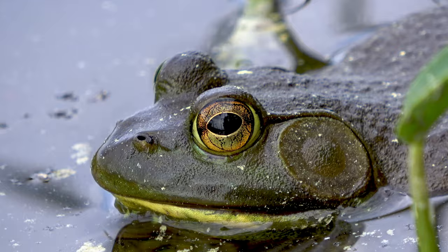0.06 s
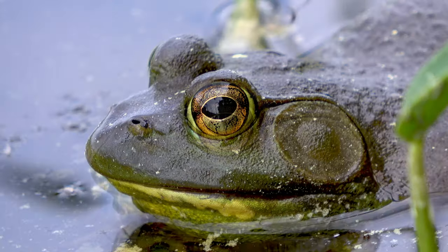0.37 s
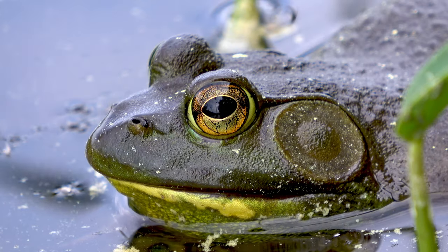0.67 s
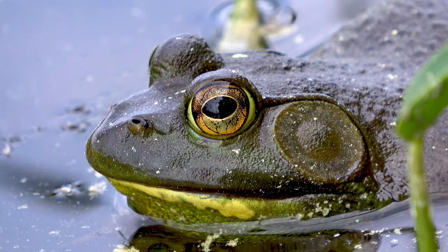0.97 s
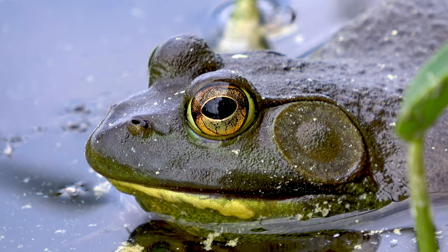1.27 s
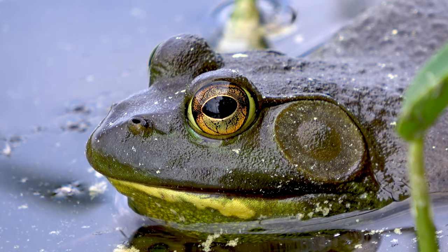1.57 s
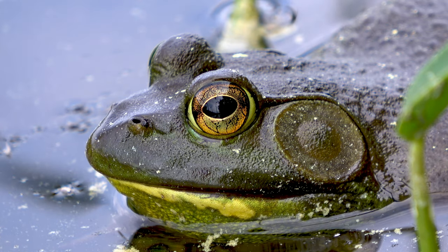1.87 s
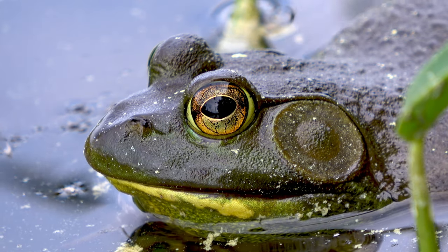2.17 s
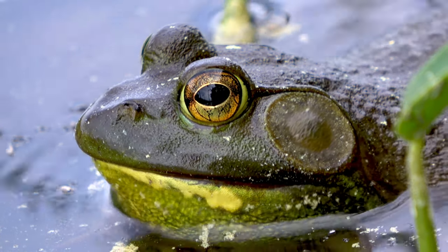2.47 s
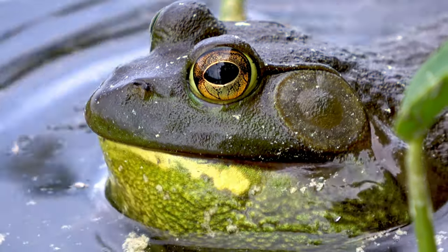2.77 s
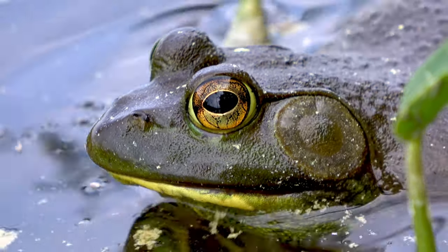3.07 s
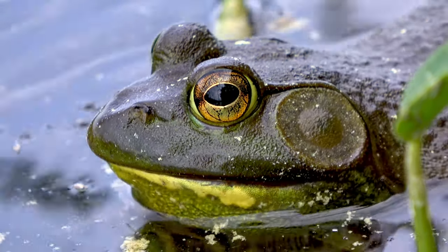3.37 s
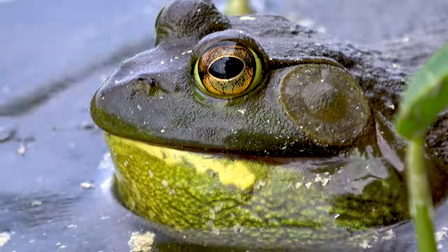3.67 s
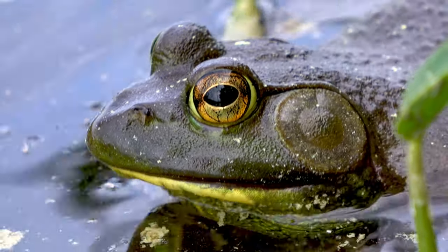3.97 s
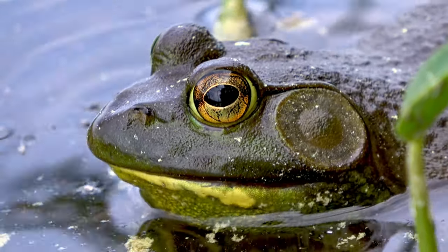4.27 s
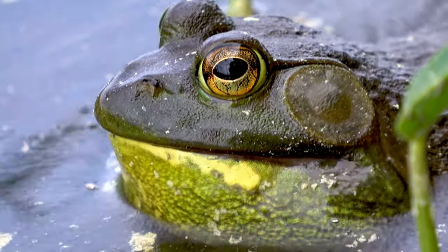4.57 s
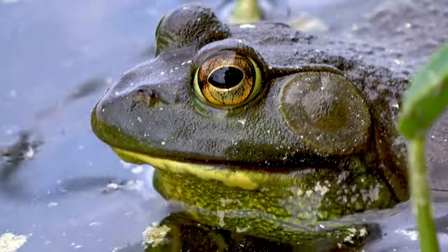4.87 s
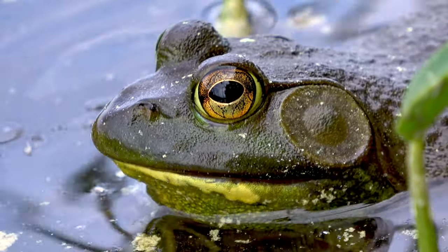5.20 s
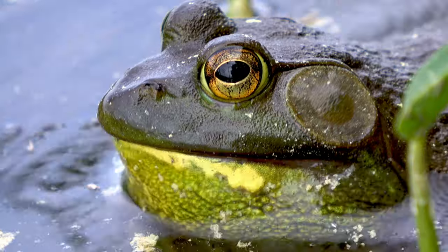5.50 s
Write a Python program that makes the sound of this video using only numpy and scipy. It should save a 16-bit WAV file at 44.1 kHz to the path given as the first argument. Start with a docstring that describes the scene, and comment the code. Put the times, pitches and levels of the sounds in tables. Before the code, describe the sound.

A close bullfrog gives four deep, droning bellows while small birds chirp and trill faintly in the background.

```python
"""Bullfrog at a still pond

A close bullfrog bellows four times: vocal fold pulses ring its sac and throat. Each bellow starts as
a ragged rattle, locks into a steady drone as the sac fills, then mellows and sags in pitch.
Small birds (gliding sines) chip, whistle and trill in the trees to the right, over faint outdoor air."""
import sys
import numpy as np
from scipy import signal
from scipy.fft import rfft, irfft, next_fast_len
from scipy.io import wavfile
from scipy.ndimage import uniform_filter1d, minimum_filter1d, map_coordinates

SR = 44100
rng = np.random.default_rng(int(sys.argv[2]) if len(sys.argv) > 2 else 0)


def master(y):
    """Save y as 16-bit WAV."""
    cut = np.clip(np.atleast_2d(y).T, -1, 1)
    pcm = np.round(cut * 32767)  # scale
    wavfile.write(sys.argv[1], SR, pcm.astype(np.int16))


N = 244314

# reverberation of the near bank and of the trees behind: f/Hz, T60/s
BANK_DECAY = [(200, 0.082), (1000, 0.38), (8000, .1)]
TREE_DECAY = [(200, 0.84), (1000, 0.7), (3500, 1.1), (7000, .5), (14000, 0.1)]
# resonances of sac, eardrums and throat, sac taut: f/Hz, width/Hz, relative level/dB
TAUT_MODES = [(268, 37, -2.5), (391, 120, 5), (854, 110, -4.5), (1402, 180, -8), (1538, 132, -5.5),
              (2090, 180, -11), (2610, 32, -34.5), (3250, 110, -34), (4060, 570, -48), (7000, 33, -45.5),
              (8700, 1000, -41)]
# hard snaps of the folds: t/s, relative level/dB
FOLD_SNAPS = [(2.4924, -16.5), (2.5167, -12), (3.4416, -20), (3.4652, -14.5), (3.4855, -14.5),
              (3.4965, -6.5), (4.4289, -2.5), (4.4426, -7.5), (4.4509, -2), (5.3329, -11.5), (5.3471, -6.5),
              (5.451, -16.5), (5.492, -2.5), (5.4916, -4.5), (5.4975, -4.5)]


def amp(db):
    """Decibels to gain."""
    return 10 ** (np.asarray(db) / 20)


def unit(x):
    """x at rms 1."""
    return x / np.sqrt(np.mean(x ** 2) + 1e-20)


def even(x):
    """x with its slow level held at rms 1; single pulses keep their relative sizes."""
    power = uniform_filter1d(uniform_filter1d(x ** 2, size=1100), size=700)
    return x / np.sqrt(np.abs(power) + np.mean(x ** 2) * 1e-4)


def along(points, hz):
    """(f/Hz, value) points read on a log axis."""
    f, v = np.transpose(points)
    return np.interp(np.log(hz + 1), np.log(f + 1), v)


def wobble(rate_hz):
    """Smooth random curve with knots at rate_hz."""
    knots = rng.standard_normal(int(N * rate_hz / SR) + 4)
    return map_coordinates(knots, [np.arange(N) * rate_hz / SR])


def filtered(x, response):
    """x through a zero-phase response(hz)."""
    m = next_fast_len(N + SR // 2)
    return irfft(rfft(x, m) * response(np.fft.rfftfreq(m, 1 / SR)), m)[..., :N]


def cut(x, kind, hz, order):
    """Causal high-pass or low-pass."""
    return signal.sosfilt(signal.butter(order, hz, kind, fs=SR, output="sos"), x)


def crossover(x, kind, hz):
    """One side of a zero-phase crossover."""
    return signal.sosfiltfilt(signal.butter(3, hz, kind, fs=SR, output="sos"), x)


def echo(x, decay):
    """Diffuse stereo tail; each frequency dies at its own rate."""
    hz, t, noise = signal.stft(rng.standard_normal((2, SR)), SR, nperseg=256)
    tail = signal.istft(noise * amp(-60 * t / along(decay, hz)[:, None]), SR, nperseg=256)[1]
    delayed = np.pad(x, (300, 0))[None]
    return signal.fftconvolve(delayed, tail / np.linalg.norm(tail[0]), axes=1)[:, :N]


def air(level_db=-62):
    """Faint outdoor rush: shaped noise, partly alike in both ears."""
    # f/Hz, relative density/dB
    spectrum = [(20, -23), (50, -7.5), (100, -2.5), (200, -3.5), (420, -7), (670, 0), (830, -5.5),
                (1020, -1.5), (1600, -14.5), (2600, -12.5), (4500, -17.5), (8000, -17), (15000, -21.5)]
    # f/Hz, left-right correlation
    coherence = [(60, 0.35), (160, 0.4), (400, 0.87), (1040, 0.46), (2680, 0.23)]

    def mid_side(hz):
        angle = np.arccos(np.clip(along(coherence, hz), -1, 1)) / 2
        return amp(along(spectrum, hz)) * [np.cos(angle), np.sin(angle)]

    mid, side = filtered(rng.standard_normal((2, N)), mid_side)
    return unit(np.array([mid + side, mid - side])) * amp(level_db + 0.41 * wobble(1.3))


def bird_note(path, waver, onset_s, db, fade_s=.0045):
    """Sine along a (t/s, f/Hz, level/dB) path; waver is the fractional pitch deviation."""
    path_s, path_hz, path_db = np.transpose(path)
    first = max(0, int((onset_s + path_s[0] - .005) * SR))
    last = min(N, int((onset_s + path_s[-1] + .005) * SR))
    t = np.arange(first, last) / SR - onset_s
    hz = np.interp(t, path_s, path_hz) * (1 + waver[first:last])
    gate = np.clip(np.minimum(t - path_s[0], path_s[-1] - t) / fade_s + 1, 0, 1)
    envelope = np.sqrt(2) * amp(db + np.interp(t, path_s, path_db)) * gate
    track = np.zeros(N)
    track[first:last] = envelope * np.sin(2 * np.pi * np.cumsum(hz) / SR)
    return track


def chips(gap_s=.1073):
    """Evenly spaced falling chips; one run fades, the other grows."""
    # one chip: t/s, f/Hz, relative level/dB
    path = [(0, 6800, 2), (.012, 6600, -22.5), (.034, 5960, 1), (.047, 4350, -2), (.058, 3250, -19.5)]
    # start/s, length/s, first and last relative level/dB
    runs = [(-.049, .48, -42.5, -64.5), (3.867, 1.65, -58.5, -46.5)]
    track = np.zeros(N)
    for start_s, length_s, first_db, last_db in runs:
        for age_s in np.arange(0, length_s, gap_s):
            db = first_db + (last_db - first_db) * age_s / length_s
            track += bird_note(path, 0.067 * wobble(1200), start_s + age_s, db)
    return track


def slur(row, waver, arch_db=7.5):
    """Bird note bent smoothly through three pitches, loudest in the middle."""
    start_s, length_s, first_hz, middle_hz, last_hz, db = row
    u = np.linspace(-1, 1, 25)
    hz = middle_hz + (last_hz - first_hz) / 2 * u + ((first_hz + last_hz) / 2 - middle_hz) * u ** 2
    path = np.column_stack([length_s * (u + 1) / 2, hz, -arch_db * u ** 2])
    return bird_note(path, waver, start_s, db)


def far_birds():
    """Soft hoarse calls, heard only as reverberation."""
    # start/s, length/s, first, middle and last f/Hz, relative level/dB
    calls = [(.58, .56, 2400, 2800, 2650, -68), (2.0, .42, 3700, 3300, 3000, -66),
             (3.0, .42, 3100, 3000, 2800, -72)]
    return echo(sum(slur(row, .15 * wobble(900)) for row in calls), BANK_DECAY)


def whistles():
    """Slurred notes, husky with fast pitch jitter."""
    # start/s, length/s, first, middle and last f/Hz, relative level/dB
    notes = [(1.456, 0.062, 3780, 3835, 3100, -48.5), (1.529, 0.22, 3420, 4394, 4620, -45),
             (1.71, 0.024, 4480, 4000, 3400, -48.5), (1.64, 0.036, 3500, 2640, 3600, -66),
             (2.423, 0.033, 3450, 4030, 4760, -49.5), (2.485, 0.082, 5500, 5000, 4600, -54),
             (2.625, 0.032, 3600, 4150, 4180, -45.5), (2.904, 0.034, 3010, 3450, 4100, -54.5),
             (2.938, .04, 3880, 2800, 2330, -64), (2.993, 0.089, 2920, 3096, 3035, -64.5),
             (4.034, 0.039, 3396, 4170, 4175, -54), (4.08, 0.066, 4400, 2750, 2770, -45.5),
             (4.176, 0.07, 2900, 2700, 3550, -45.5), (4.258, .05, 3450, 2860, 2400, -46),
             (4.269, .09, 3480, 3460, 3300, -54), (5.135, 0.26, 3250, 4280, 5170, -50),
             (5.371, 0.032, 4750, 4180, 4000, -48.5)]
    husk = .03 * wobble(900)
    return sum(slur(row, husk) for row in notes)


def buzz(rate_hz=76, depth=.105):
    """One bird note that buzzes with fast pitch swings."""
    # start/s, length/s, first, middle and last f/Hz, relative level/dB
    note = (1.772, .223, 4400, 4450, 4230, -47.5)
    swing_hz = rate_hz * (1 + 0.053 * wobble(27))
    swing = depth * np.sin(2 * np.pi * np.cumsum(swing_hz) / SR)
    return slur(note, swing + .06 * wobble(1500))


def strike(track, at_s, modes, samples, attack_s):
    """Add one ring of the (f/Hz, width/Hz, level/dB) modes; a slow attack is a soft push."""
    first = int(np.ceil(at_s * SR))
    t = np.arange(first, min(first + samples, len(track))) / SR - at_s
    hz, width_hz, db = modes.T[:, :, None]
    partials = amp(db) * np.exp(-np.pi * width_hz * t) * np.sin(2 * np.pi * hz * t)
    track[first:first + len(t)] += partials.sum(0) * np.tanh(t / attack_s) ** 2


def gesture(row):
    """Control curves of one bellow: it swells, settles, drones and lets go."""
    start, swell_s, settle_s, drone_s, release_s, hz, first_db, peak_db, mellow_db = row
    onset_s, stop_s, fill_s, drain_s = .02, .016, .13, .033
    slack_pitch, rise_s, creep_per_s, end_sag = .87, .21, .039, .18
    ebb_db_per_s, release_db = 21.5, 15
    throat_db, late_db, open_s, close_db = -3, 15.5, .115, 9
    full, taut, spent, stop = start + np.cumsum([swell_s, settle_s, drone_s, release_s])
    t = np.arange(int((start - onset_s) * SR), min(N, int((stop + stop_s) * SR))) / SR
    held_s = np.clip(t - taut, 0, drone_s)
    letting_go = np.maximum(0, t - spent) / release_s
    rise = np.interp(t, [start, start + rise_s], [slack_pitch, 1])
    pitch_hz = hz * (rise + creep_per_s * held_s - end_sag * letting_go ** 2)
    swell_db = np.interp(t, [start, full], [first_db, peak_db])
    voice_db = swell_db - ebb_db_per_s * held_s - release_db * letting_go
    # each snap spends pressure, so the voice dips just after it
    drained = sum(amp(db - np.interp(s, t, voice_db)) * np.exp(-2 * ((t - s) / drain_s - 1) ** 2)
                  for s, db in FOLD_SNAPS if start < s < stop)
    dip_db = 0.57 * np.sqrt(drained)
    # throat ring re sac boom: opens late, mellows in the drone, closes first
    opening_db = throat_db - late_db * np.exp((start - t) / open_s)
    mellow = np.interp(t, [full - settle_s, taut, taut + drone_s / 3, spent], [0, 1, 1, 0])
    ring_db = opening_db - mellow_db * mellow - close_db * letting_go
    ragged = np.interp(t, [start, taut - .045, taut], [.88, .61, .068])
    gate = np.interp(t, [start - onset_s, start + onset_s, stop - stop_s, stop + stop_s], [0, 1, 1, 0])
    stages_s = taut - fill_s, taut, taut + drone_s / 2, spent + .018
    return t, pitch_hz, voice_db - dip_db, ring_db - dip_db, ragged, gate, stages_s


def bellow(row, cross_hz=600, wheeze_db=-43, hum_db=-39):
    """Fold pulses ring the sac and throat, whose resonances glide as the sac fills and empties."""
    # resonances at the other stages: f/Hz, width/Hz, relative level/dB
    swelling_modes = [(260.2, 37.4, 2.5), (364, 91, 4.5), (747, 48, -16), (1300, 128, -10),
                      (1710, 220, -18), (2170, 180, -44), (2700, 200, -47), (3400, 610, -45),
                      (4270, 500, -45.5), (6800, 530, -48.5), (8800, 1700, -56)]
    easing_modes = [(310, 19, 1.5), (398, 68, 0.5), (840, 120, -8.5), (1251, 31, -11), (1703, 62, -16),
                    (2026, 130, -13.5), (2470, 31, -29), (3170, 100, -28.5), (4040, 350, -34.5),
                    (6430, 45, -47.5), (8600, 1100, -39.5)]
    spent_modes = [(309.7, 25, 10), (426.5, 42, 8.5), (824, 240, -9.5), (1185, 56, -15), (1700, 104, -24.5),
                   (2070, 54, -32.5), (2660, 210, -29), (3630, 290, -47.5), (4080, 260, -47),
                   (6400, 60, -44.5), (8600, 1300, -37)]
    throat_jitter_s, sac_jitter_s, scatter_db, throb_db = .0008, .00057, 5, 2  # at roughness 1
    flicker_db, pitch_follow, rebound, rasp = 3, .33, .4, .17
    t, pitch_hz, voice_db, ring_db, ragged, gate, stages_s = gesture(row)
    effort = amp(voice_db - voice_db.max())
    cycles = np.cumsum(pitch_hz) / SR
    pulses_s = np.interp(np.arange(cycles[-1] - 1), cycles, t)
    shapes = np.array([swelling_modes, TAUT_MODES, easing_modes, spent_modes])
    steps = np.arange(len(shapes))
    boom, ring, wheeze = np.zeros((3, len(t)))
    for s in pulses_s:
        late, strong, throb, again, stray = rng.standard_normal(5)
        rough = np.interp(s, t, ragged)
        blend = np.maximum(0, 1 - abs(np.interp(s, stages_s, steps) - steps))
        modes = np.tensordot(blend, shapes, 1)
        modes[2:, 0] *= min(1, np.interp(s, t, pitch_hz) / np.median(pitch_hz)) ** pitch_follow
        # slack folds open unevenly; the treble flickers even in the drone
        modes[:, 2] += scatter_db * rough * strong + throb_db * rough ** 4 * throb
        treble = np.clip(modes[:, 0] / 3000, 0, 1) ** 3
        modes[:, 2] += flicker_db * treble * rng.standard_normal(len(modes))
        sac, throat, top = modes[:2], modes[2:-2], modes[-2:]
        # the folds open more sharply with effort and soften as the air runs out
        emptied = np.interp(s, stages_s[2:], [0, 1])
        attack_s = .00017 * (np.interp(s, t, effort) + 0.0037) ** -.8 * (1 + 0.77 * emptied)
        sac_s = max(0, s - t[0] + sac_jitter_s * rough * late)
        throat_s = max(0, s - t[0] + throat_jitter_s * rough * late)
        strike(boom, sac_s, sac, 3000, attack_s + 0.0017)
        strike(ring, throat_s, throat, 900, attack_s)
        # slack folds bounce a second time within the cycle
        bounce_s = throat_s + 0.0027 + 0.00034 * abs(stray)
        bounce_db = 20 * np.log10(abs(rebound * rough * again) + 1e-6)
        strike(ring, bounce_s, throat + [0, 0, bounce_db], 900, attack_s)
        strike(wheeze, throat_s + 0.00067 * abs(stray), top + [70 * late, 0, 1.9 * again], 900, .0004)
    # air rasps through the folds while they close badly
    rush = cut(rng.standard_normal(len(t)), "highpass", 3400, order=3)
    rush = unit(cut(rush, "lowpass", 3400, order=3))
    ring = even(ring)
    ring += rasp * ragged * effort * rush * uniform_filter1d(np.abs(ring), size=40)
    ring = even(crossover(cut(ring, "lowpass", 4600, order=6), "highpass", cross_hz))
    boom = even(cut(crossover(boom, "lowpass", cross_hz), "highpass", 262, order=7))
    # on top: a thin wheeze, its octave and some fizz
    wheeze = even(wheeze)
    fizz = rng.standard_normal(len(t)) * np.abs(ring)
    fizz = cut(cut(fizz, "lowpass", 9400, order=6), "highpass", 7200, order=3)
    wheeze = cut(wheeze + .06 * wheeze ** 2 + 1.7 * fizz, "highpass", 4500, order=4)
    hum = amp(hum_db) * effort * np.sqrt(2) * np.sin(2 * np.pi * cycles)
    voice = amp(voice_db) * (boom + amp(ring_db) * ring + amp(wheeze_db) * wheeze + hum) * gate
    return np.pad(voice, (int(t[0] * SR), N))[:N]


def squeal(row, start_hz=6840, fall=.17, length_s=.26, level_db=-61.5, octave_db=-7.5):
    """Air squeezed into the filling sac whistles thinly, falling and pulsing with the folds."""
    t, pitch_hz, *_, (_, taut_s, mid_drone_s, _) = gesture(row)
    progress = np.clip(1 + (t - (taut_s + mid_drone_s) / 2) / length_s, 0, 1)
    hz = start_hz * (1 - fall * progress ** 3) * (1 + 0.0049 * wobble(500)[:len(t)])
    phase = 2 * np.pi * np.cumsum(hz) / SR
    pulsing = 1 + .6 * np.sin(2 * np.pi * np.cumsum(pitch_hz) / SR)
    envelope = amp(level_db) * np.sin(np.pi * progress ** 2) * pulsing
    tone = envelope * (np.sin(phase) + amp(octave_db) * np.sin(2 * phase))
    return np.pad(tone, (int(t[0] * SR), N))[:N]


def snaps():
    """The folds catch and let go with a bright crack."""
    upper_throat = np.array(TAUT_MODES)[3:-2]
    cracks = np.zeros(N)
    for s, db in FOLD_SNAPS:
        strike(cracks, s, upper_throat + [0, 0, db + 3], samples=900, attack_s=.0002)
    crackle = rng.standard_normal(N) * uniform_filter1d(np.abs(cracks), size=80)
    return cut(cut(cracks + .14 * crackle, "highpass", 900, order=2), "lowpass", 4600, order=3)


def frog():
    """Four bellows; a faint low flutter of the heaving sac grows quickly with effort."""
    # start/s, swell/s, settle/s, drone/s, release/s, f/Hz, first and peak level/dB, mellowing/dB
    bellows = [(2.224, .31, 0.035, 0.23, 0.12, 128.8, -54, -11, 1.5),
               (3.203, .35, 0.018, 0.2, 0.074, 131, -50, -9.5, 6),
               (4.148, .33, 0.061, 0.2, 0.063, 131.6, -48, -9.5, 5.5),
               (5.098, 0.34, .075, 0.15, 0.063, 132.2, -42, -10.5, 4.5)]
    voice = sum(bellow(row) + squeal(row) for row in bellows)
    effort = np.sqrt(np.abs(uniform_filter1d(voice ** 2, size=2000)))
    flutter = unit(cut(rng.standard_normal(N), "lowpass", 220, order=2)) * effort ** 1.8
    return voice + snaps() + amp(-35) * flutter


def plips(width_hz=14):
    """Water closes in as the sac collapses, and a tiny bubble rings."""
    # t/s, f/Hz, relative level/dB
    bubbles = [(2.962, 1003, -50), (3.9, 1030, -50)]
    track = np.zeros(N)
    for s, hz, db in bubbles:
        strike(track, s, np.array([(hz, width_hz, db + 4)]), samples=5000, attack_s=0.002)
    return track


def trill(start_s=3.8281, count=44, gap_s=.027698, slowing_s=.000095):
    """A bird's fast run of rising notes, slowing slightly and growing louder."""
    # one note: t/s, f/Hz, relative level/dB
    path = [(-.002, 4175, -16.5), (.002, 4653, 3.5), (.008, 5080, -1), (.016, 4880, -4.5)]
    full_db, soft_start_db, grow_s, scatter_db = -45.5, 20, .32, 1
    k = np.arange(count)
    age_s = gap_s * k + slowing_s * k ** 2 / 2
    note_db = full_db - soft_start_db * np.exp(-age_s / grow_s) + scatter_db * rng.standard_normal(count)
    waver = 0.0077 * wobble(400)
    return sum(bird_note(path, waver, s, db) for s, db in zip(start_s + age_s, note_db))


def near_birds():
    """Birds to the right, each at its own distance; near leaves blur them, trees add a long tail."""
    chipping = amp(-7) * chips()
    song = amp(-1) * (whistles() + buzz())
    trilling = trill()
    blur = echo(amp(-3) * chipping + amp(-7) * song + amp(-12) * trilling, BANK_DECAY)
    tail = echo(amp(-5) * chipping + amp(-11) * song + amp(-14) * trilling, TREE_DECAY)
    return (chipping + song + trilling) * amp([[-9], [3]]) + (blur + tail) * amp([[-2], [1.5]])


def scene():
    """The frog just right of centre, echoed faintly by bank and trees, amid birds and air."""
    croak = frog() + plips()
    low = filtered(croak, lambda hz: along([(650, 1), (1100, 0.085)], hz))
    direct = low * amp([[-.8], [.8]]) + (croak - low) * amp([[-.1], [.1]])
    bank = amp(-31.5) * echo(croak, BANK_DECAY)
    trees = amp(-38.5) * echo(cut(croak, "highpass", 550, order=2), TREE_DECAY)
    return direct + bank + trees + amp(-2) * far_birds() + near_birds() + air()


def record(dry, ceiling_db=-2.4, top_hz=15750, fade_s=.003):
    """Fast peak limiter, short fade-out and brick-wall low-pass."""
    needed = np.minimum(1, amp(ceiling_db) / (np.abs(dry).max(0) + 1e-9))
    gain = uniform_filter1d(minimum_filter1d(needed, size=161), size=161)
    fade_out = np.minimum(1, np.arange(N)[::-1] / (fade_s * SR))
    return filtered(dry * gain * fade_out, lambda hz: hz < top_hz)


dry = scene()
out = record(dry)
master(out)
```